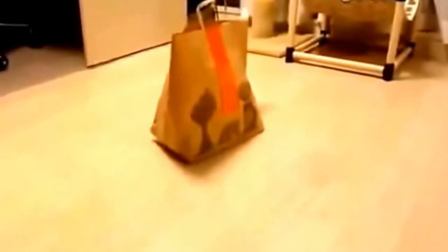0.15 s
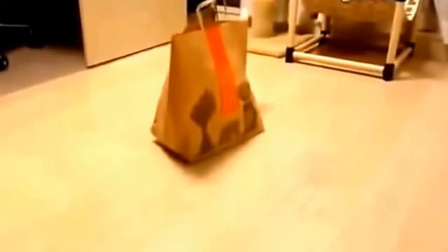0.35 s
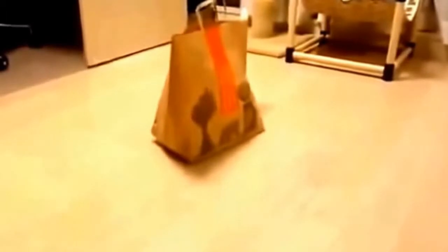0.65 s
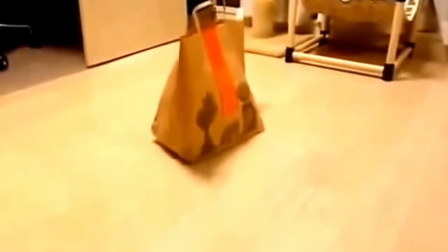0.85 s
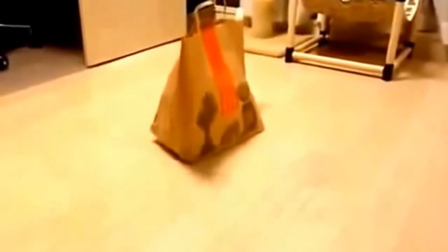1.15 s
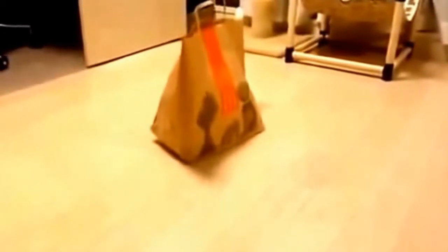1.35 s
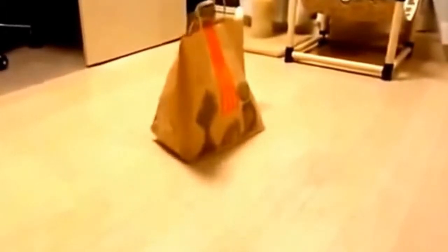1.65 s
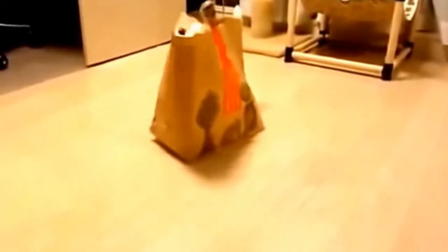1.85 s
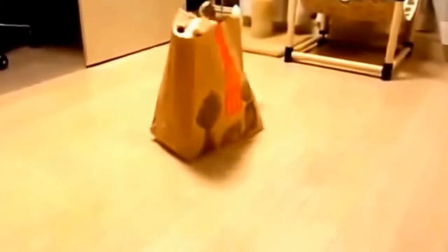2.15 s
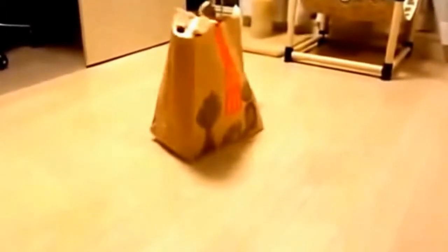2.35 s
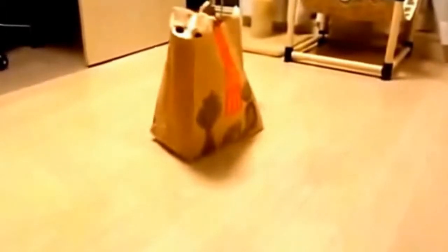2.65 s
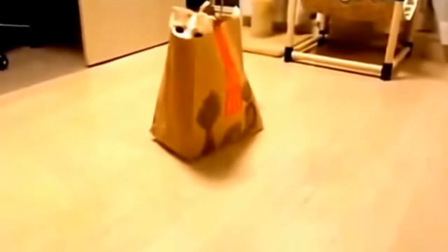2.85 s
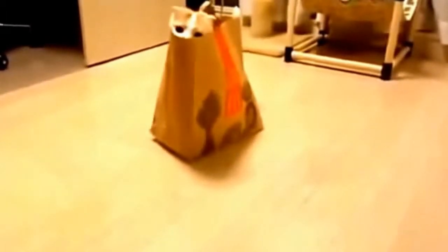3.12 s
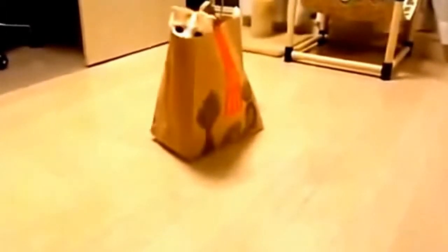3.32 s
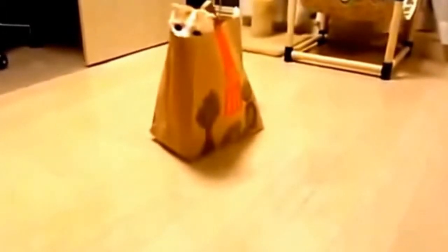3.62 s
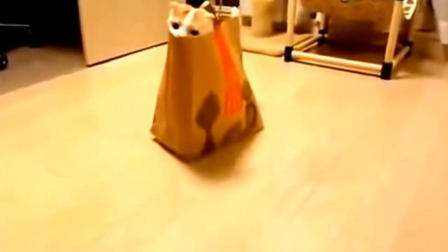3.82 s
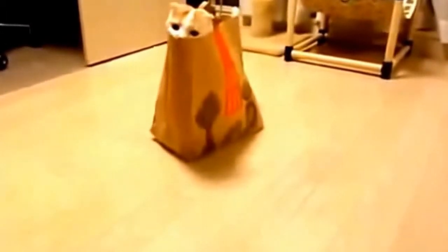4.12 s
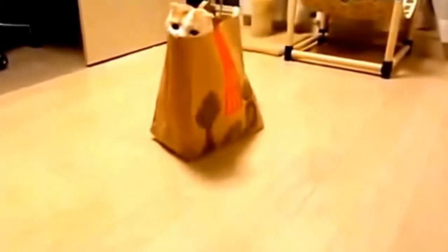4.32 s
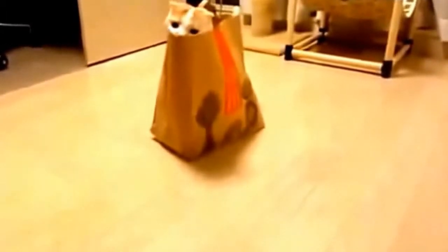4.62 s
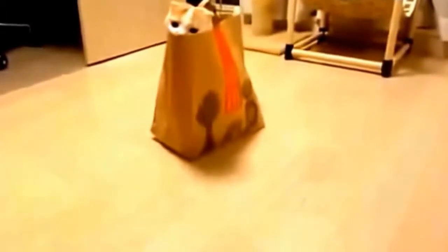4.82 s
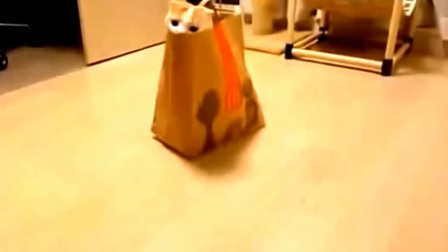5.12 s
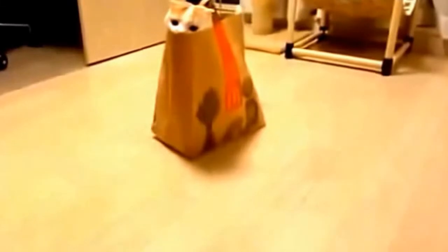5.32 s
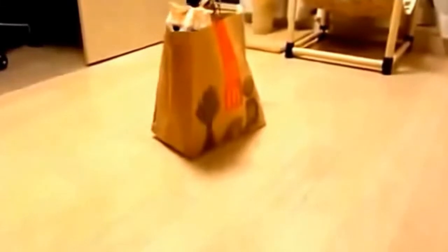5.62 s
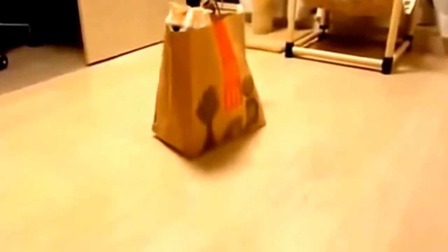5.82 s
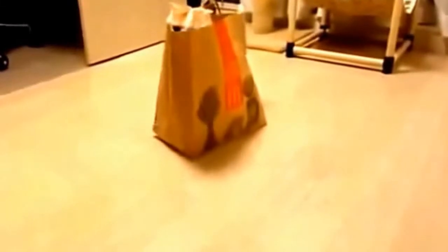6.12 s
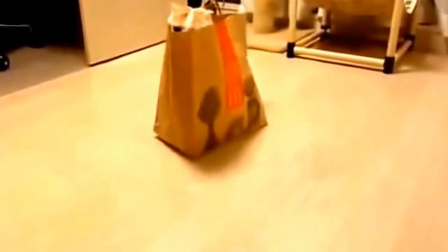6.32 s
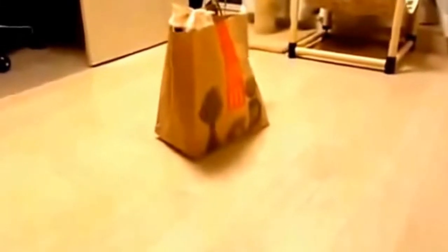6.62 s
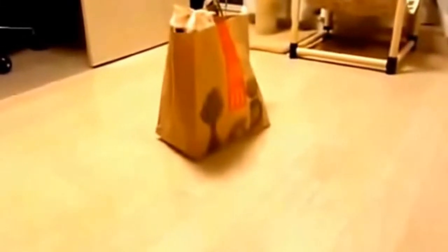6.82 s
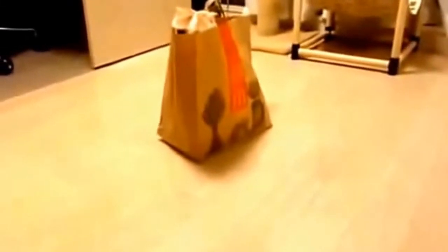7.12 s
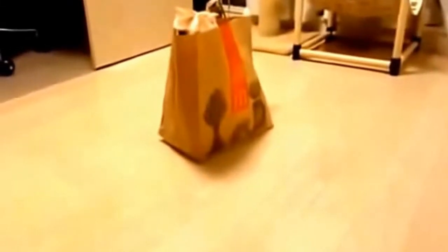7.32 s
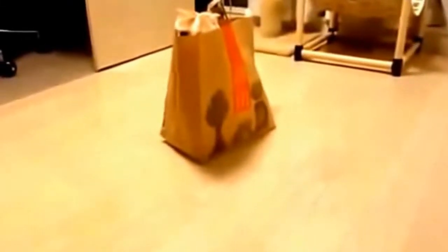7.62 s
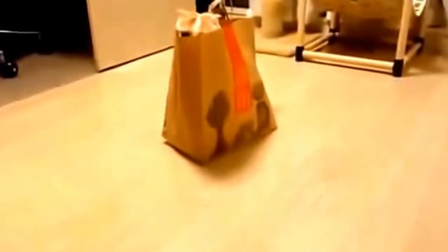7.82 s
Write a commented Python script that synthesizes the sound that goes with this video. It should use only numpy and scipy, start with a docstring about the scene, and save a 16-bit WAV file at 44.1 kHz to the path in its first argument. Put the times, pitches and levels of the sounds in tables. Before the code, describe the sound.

A cat shifts inside a paper bag on a wooden floor, a couple of metres from the microphone. Soft rustles and hollow pops of the stiff paper come in short bursts with pauses between. Past the middle, a louder, sharper crinkle breaks out, followed by a run of crackles and pops before the bag settles. A low appliance hum and soft hiss continue in the slightly echoing room.

```python
"""A bare room with a wooden floor, where a cat shifts inside a paper bag a couple of metres away.
Stiff panels buckle with hollow pops, creases snap, and stick-slip friction of fur and paper gives swarms
of tiny crackles and a few thin squeaks; once there is a very high tick. The bag's resonances colour the
crackles, and the room reverberates over an appliance's low hum and a soft hiss."""
import sys
import numpy as np
from scipy import signal
from scipy.fft import rfft, irfft, next_fast_len
from scipy.io import wavfile
from scipy.ndimage import uniform_filter1d

SR = 44100
rng = np.random.default_rng(int(sys.argv[2]) if len(sys.argv) > 2 else 0)


def to_wav(sig):
    """Store sig (one row per channel, or 1-D mono) as 16-bit WAV at the path in sys.argv[1].

    Samples outside -1..1 are clipped; the rate is SR.
    """
    pcm = np.clip(np.atleast_2d(sig), -1, 1) * 32767
    pcm = np.round(pcm).astype(np.int16)
    wavfile.write(sys.argv[1], SR, pcm.T)  # frames by channels


N = 350947
TIME = np.arange(N) / SR

# Spectrum of room air and microphone hiss. Each row: frequency in Hz, relative density in dB.
AIR_SPECTRUM = [(20, -15), (30, -7), (45, -11), (65, -5.5), (90, 1.5), (140, -2), (220, -11), (370, -16.5),
                (560, -11.5), (730, -4.5), (900, -13), (1400, -15.5), (2500, -20), (6500, -27.5),
                (12000, -26.5), (15000, -36.5)]
# Stereo width of the background noise; toward the highest treble both channels carry the same sound. Each row:
# frequency in Hz, side minus mid level in dB.
HISS_SPREAD = [(30, 0), (80, -14), (200, -7.5), (400, 1.5), (700, -11), (1300, -2.5), (2400, -0.5),
               (4400, 2), (8000, 0), (12000, -85)]
# Tones of a household appliance. Each row: frequency in Hz, level in dB.
HUM_TONES = [(59.5, -82), (87.5, -62), (91.5, -62), (118.4, -63), (371, -69), (484.5, -67.5), (710.6, -66),
             (1050, -75)]
# The cat rubs against the paper. Each row: time of the peak in seconds, relative level in dB,
# swell and fade times in seconds, brightness in dB, relative level of the panels' flutter in dB.
CAT_RUBS = [(0.765, -66, 0.024, 0.054, -8, -41.5), (0.875, -59, 0.042, 0.04, -4.5, -43.5),
            (1.08, -44, 0.054, 0.04, -9.5, -38.5), (1.186, -40, 0.041, 0.056, -11.5, -39.5),
            (1.299, -48.5, 0.047, 0.058, -2, -41.5), (2.54, -49.5, 0.049, 0.07, -0.5, -42),
            (2.645, -41.5, 0.062, 0.073, -22, -43), (2.695, -43.5, 0.026, 0.064, -15.5, -42),
            (2.805, -51, 0.059, 0.096, -8.5, -49), (3.62, -64, 0.1, 0.027, -0.5, -68),
            (3.905, -50.5, 0.032, 0.035, -15, -39.5), (4.02, -71, 0.072, 0.054, -24, -40.5),
            (4.1, -43, 0.04, 0.028, -10, -45), (4.235, -44.5, 0.065, 0.064, -10.5, -36.5),
            (4.372, -48.5, 0.13, 0.049, -8, -46), (4.97, -47, 0.052, 0.033, -20, -61),
            (5.09, -57.5, 0.037, .03, 7.5, -47), (5.125, -28, 0.01, 0.038, -11.5, -35),
            (5.16, -32, 0.025, 0.036, -20, -41), (5.204, -33.5, 0.02, 0.027, -7.5, -45),
            (5.245, -34, 0.025, 0.034, -22, -43.5), (5.37, -40.5, 0.045, 0.086, -39, -45),
            (5.825, -54.5, 0.04, 0.059, -0.5, -62), (5.857, -31, 0.017, 0.029, -34, -34),
            (6.09, -40, 0.053, 0.075, -13.5, -42.5), (6.225, -45.5, 0.044, 0.05, -5.5, -50),
            (6.262, -33.5, 0.024, 0.023, -9.5, -42), (6.378, -40, 0.042, 0.054, -16, -39.5),
            (6.826, -41, 0.017, 0.034, -10.5, -46)]
# Resonances of the bag. Each row: frequency in Hz, bandwidth in Hz, gain in dB.
BAG_MODES = [(381, 13, -6), (554, 38, -3), (760, 71, -2), (855, 110, -1), (1044, 110, 4), (1440, 46, -0.5),
             (1773, 35, -3), (2210, 98, -6), (2780, 26, -4), (3240, 81, -13), (3800, 56, -27)]
# Stereo width of the reverberation. Each row: frequency in Hz, side minus mid level in dB.
ECHO_SPREAD = [(80, -2), (400, -27), (700, -19), (1300, -7.5), (2400, -2), (4400, 2.5), (8000, -3),
               (12000, -12)]
# A crease gives way. Each row: start in seconds, relative level in dB, pitch in Hz,
# bandwidth in octaves, brightness in dB, decay time in seconds.
CREASE_SNAPS = [(0.1504, -43.5, 3500, 1.8, -18, 0.0033), (0.162, -49, 3000, 1.9, -17, 0.0036),
                (1.058, -36, 1720, 0.78, -40, 0.004), (1.191, -34, 935, 0.58, -9, 0.0022),
                (1.876, -48.5, 1390, 1.3, -45, 0.003), (1.886, -51, 1890, 0.93, -37, 0.0037),
                (2.495, -57, 900, 1.5, -19, 0.0018), (2.644, -47, 1400, 1.3, -34, 0.004),
                (2.66, -43, 1200, 1.1, -28, 0.0018), (2.779, -49, 1200, 1.2, -26, 0.0036),
                (2.917, -53, 740, 1.2, -24, 0.0014), (4.0704, -40, 800, 1.3, -34, 0.0022),
                (4.084, -38, 1260, 1, -22, 0.0038), (4.194, -40, 750, 0.7, -15, 0.0018),
                (4.2145, -30.5, 875, 0.62, -15, 0.0014), (4.314, -37.5, 980, 0.81, -9.5, 0.0028),
                (4.909, -37, 1870, 1.03, -56, 0.0025), (4.97, -41, 1290, 1.7, -34, .003),
                (5.103, -25, 1700, 1.6, -1.5, 0.0041), (5.143, -33.5, 1500, 1.6, -10, 0.0046),
                (5.154, -25, 2700, 1.2, -18, 0.0028), (5.1915, -27.5, 2300, 0.97, 0, 0.0019),
                (5.3595, -26.5, 1750, 0.65, -68, 0.003), (5.42, -37, 1540, 1.6, -18, 0.0029),
                (5.46, -43, 2360, 1.1, -35, 0.0033), (5.814, -49, 2250, 1.4, -24, 0.0034),
                (5.842, -32.5, 1900, 2.1, -28, 0.0064), (5.849, -31, 3800, 1.35, -40, 0.0049),
                (5.857, -29, 2070, 1.25, -33, 0.0041), (5.993, -46, 1300, 0.96, -23, 0.0027),
                (6.077, -32, 3000, 1.4, -21, 0.0026), (6.139, -38.5, 1400, 1.2, -33, 0.0026),
                (6.2437, -28, 1710, 1.06, 0, 0.0026), (6.265, -33, 2700, 1.6, -18, 0.0043),
                (6.31, -28.5, 1390, 1.3, -14, 0.0018), (6.3689, -31, 1500, 1.6, -28, 0.0036),
                (6.375, -32.5, 2900, 0.72, -28, 0.0022), (6.521, -37.5, 1500, 1.5, -40, 0.0025),
                (6.8, -43, 1300, 1.6, -21, 0.0037), (6.812, -43, 1500, 1.8, -6, 0.002)]
# Hollow pops of the bag's panels, some followed about 12 ms later by a short echo.
# Each row: start in seconds, relative level in dB, pitch in Hz, decay time in seconds.
PANEL_POPS = [(0.153, -45, 696, 0.003), (0.82, -34, 400, 0.0033), (0.884, -32.5, 424, 0.0046),
              (0.9955, -30.5, 353, 0.0052), (1.064, -33.5, 451, 0.008), (1.1895, -19.5, 398, 0.0018),
              (1.2035, -24.5, 510, 0.0036), (1.268, -26.5, 280, 0.0043), (1.277, -30, 444, 0.013),
              (1.37, -35.5, 460, 0.0026), (1.875, -31, 550, 0.0022), (1.888, -39, 554, 0.0045),
              (2.458, -41.5, 526, 0.0049), (2.496, -28.5, 510, 0.0014), (2.603, -32, 423, 0.0026),
              (2.673, -27, 381, 0.0034), (2.777, -30.5, 417, 0.0041), (2.876, -39, 376, 0.0036),
              (2.916, -36, 360, 0.0038), (2.948, -34.5, 300, 0.0026), (3.894, -31.5, 358, 0.0039),
              (3.912, -27, 387, 0.0027), (4.0706, -27, 313, 0.006), (4.083, -25, 330, 0.0034),
              (4.193, -22, 305, 0.0032), (4.2045, -22.5, 532, 0.0083), (4.208, -34.5, 853, 0.0059),
              (4.2142, -22.5, 320, 0.0035), (4.252, -35, 540, .003), (4.313, -23, 387, 0.0025),
              (4.388, -34, 420, 0.003), (4.398, -37, 308, 0.0051), (4.909, -32, 600, 0.0031),
              (4.932, -31, 560, 0.0031), (4.97, -40, 680, 0.0047), (5.105, -33, 694, 0.0046),
              (5.42, -30, 744, 0.0034), (5.851, -29.5, 496, 0.0032), (5.855, -24, 1010, 0.0045),
              (5.859, -21, 760, 0.0043), (6.016, -29, 350, 0.0018), (6.112, -29.5, 364, 0.0036),
              (6.124, -28.5, 380, 0.0044), (6.229, -24.5, 409, 0.0067), (6.246, -30, 1214, 0.005),
              (6.312, -31.5, 670, 0.0054), (6.322, -33, 359, 0.0086), (6.352, -33, 335, 0.0044),
              (6.378, -28.5, 674, 0.0048), (6.5215, -24.5, 620, 0.003), (6.532, -32.5, 559, 0.0053),
              (6.8008, -33.5, 730, 0.0042)]
# Paper scrapes on paper. Each row: time of the peak in seconds, level in dB, half length in seconds,
# pitch in Hz, bandwidth in Hz.
PAPER_SQUEAKS = [(0.166, -55, 0.007, 3300, 600), (1.086, -55, 0.013, 5450, 220),
                 (2.56, -63, 0.035, 5700, 1300), (6.819, -47.5, 0.0084, 1710, 1100)]

BAG_SHIFT = 0.023  # the bag's changing shape shifts its resonances by up to about this fraction
CRACKLE_WET_DB, POP_WET_DB = -2.5, -0.5  # reverberation against direct sound


def undb(db):
    """Decibels to amplitude ratio."""
    return 10 ** (np.asarray(db) / 20)


def unit(x):
    """Scale to rms 1."""
    return x / np.sqrt(np.mean(x ** 2))


def add(track, s, sound):
    """Superpose a sound on a stereo track at s seconds."""
    i = int(s * SR)
    track[:, i:i + sound.shape[1]] += sound[:, :N - i]


def shape(x, gain_at):
    """Zero-phase filter, its gain a function of frequency."""
    size = next_fast_len(len(x), True)
    f = np.maximum(np.fft.rfftfreq(size, 1 / SR), 1)
    return irfft(rfft(x, size) * gain_at(f), size)[:len(x)]


def band(x, lo_hz, hi_hz, order=2):
    """Band-pass that conserves the power of white noise."""
    def gain_at(f):
        detuning = (f ** 2 - lo_hz * hi_hz) / (f * (hi_hz - lo_hz))
        return unit(1 / np.hypot(1, detuning ** order))
    return shape(x, gain_at)


def dull(x, top_hz, order=6):
    """Steep low-pass."""
    return shape(x, lambda f: 1 / np.hypot(1, (f / top_hz) ** order))


def colour(x, points):
    """Impose a spectral envelope of (Hz, dB) points."""
    hz, db = np.transpose(points)
    return shape(x, lambda f: undb(np.interp(np.log(f), np.log(hz), db)))


def walk(rate):
    """Random modulation of spread near 1, with rate knots per second."""
    knots = rng.standard_normal(int(N / SR * rate) + 2)
    return 1.4 * np.interp(TIME * rate, np.arange(len(knots)), knots)


def diffuse(size, width):
    """Partly coherent stereo noise: width sets the side level against the mid at each frequency."""
    mid, side = rng.standard_normal(size), colour(rng.standard_normal(size), width)
    return np.array([mid + side, mid - side])


def air_and_hum(air_db=-54.5):
    """Noise floor: broadband air and hiss under hum tones that waver in amplitude and phase."""
    air = unit(np.array([colour(channel, AIR_SPECTRUM) for channel in diffuse(N, HISS_SPREAD)]))
    air *= undb(air_db + 0.5 * walk(6.4))
    hum = sum(undb(db + walk(4.8)) * np.sin(2 * np.pi * hz * TIME + walk(4.6)) for hz, db in HUM_TONES)
    return air + np.sqrt(2) * hum


def crackle(size, rate, spread_db):
    """Fibre slips as a Poisson process, rate per second: most are faint, a few stand out."""
    slips = rng.random(size) < rate / SR
    strengths = undb(spread_db * np.minimum(rng.exponential(size=size), 4)) / np.sqrt(rate)
    return unit(slips * strengths * rng.choice([-1, 1], size))


def treble(clicks, bright_db, crisp_db, sheen_db):
    """Sharper impulses reach higher in the spectrum: two treble bands grow with brightness."""
    crisp = band(clicks * undb(crisp_db + 0.5 * bright_db), 2830, 7130, order=3)
    sheen = band(clicks * undb(sheen_db + bright_db), 7800, 13060, order=3)
    return crisp + sheen


def rubbing(rest_db=-68, rest_bright_db=-5.5, rest_flutter_db=-52.5, flutter_exponent=0.74):
    """Incoherent rubs add in power; returns level, brightness and flutter over time, in dB."""
    power, flutter = undb(rest_db) ** 2, undb(rest_flutter_db) ** 2  # the cat is never quite still
    bright = power * undb(rest_bright_db) ** 2
    for s, db, swell_s, fade_s, bright_db, flutter_db in CAT_RUBS:
        force = np.exp(-np.maximum((s - TIME) / swell_s, (TIME - s) / fade_s))
        power += (undb(db) * force) ** 2
        bright += (undb(db + bright_db) * force) ** 2
        # the big panels give easily, so their flutter starts sooner and lasts longer
        flutter += (undb(flutter_db) * force ** flutter_exponent) ** 2
    return 10 * np.log10([power, bright / power, flutter])


def rustle(loud_db=-35, loud_slips_per_s=10000):
    """Stick-slip friction: swarms of slips, denser under harder rubbing, and shaking of the big panels."""
    level_db, bright_db, flutter_db = rubbing()
    unsteady_db = walk(70)
    rate = np.clip(loud_slips_per_s * undb(0.5 * (level_db - loud_db)), 800, SR / 2)
    slips = crackle(N, rate, spread_db=1.5) * undb(level_db + unsteady_db)
    mids = undb(-8.5) * band(slips, 760, 2070)
    highs = undb(-5) * treble(slips, bright_db, crisp_db=-4.5, sheen_db=2.5)
    shakes = crackle(N, rate=1600, spread_db=1) * undb(flutter_db + unsteady_db)
    flutter = band(shakes, 288, 611) + undb(-13.5) * band(shakes, 130, 255)
    return mids + highs + undb(-7) * flutter


def bag(x, tuning, facet_count=6, low_hz=1086, high_hz=6020, facet_width_hz=77, facet_db=-3):
    """Modal resonance: the panels, the enclosed air and a few small facets of random pitch ring."""
    facets_hz = low_hz * (high_hz / low_hz) ** rng.random(facet_count)
    modes = list(BAG_MODES) + [(hz, facet_width_hz, facet_db) for hz in facets_hz]
    return x + sum(undb(db) * signal.lfilter(*signal.iirpeak(hz * tuning, hz / width_hz, fs=SR), x)
                   for hz, width_hz, db in modes)


def room(x, wet_db, t60_low_s=0.33, t60_high_s=0.46, build_s=0.00089):
    """Reverberation: direct sound, then a diffuse tail, different for every spot on the bag."""
    t = np.arange(SR // 2) / SR
    noise = diffuse(len(t), ECHO_SPREAD)
    low = signal.sosfilt(signal.butter(1, 4000, fs=SR, output="sos"), noise)
    tail = low * undb(-60 * t / t60_low_s) + (noise - low) * undb(-60 * t / t60_high_s)
    tail *= 1 - np.exp(-t / build_s)
    tail *= undb(wet_db) / np.sqrt(np.sum(tail.mean(axis=0) ** 2))
    response = signal.unit_impulse(len(t)) + tail
    return signal.fftconvolve(x[None], response, axes=1)[:, :N]


def shifting_bag(x, pose_s=0.25):
    """Resonance depends on shape: each pose of the cat retunes the bag and changes its echoes."""
    out, size = np.zeros((2, N)), int(pose_s * SR)
    for i in range(0, N, size):
        piece = np.pad(x[i:i + size], (0, SR // 20))
        ringing = bag(piece, tuning=1 + BAG_SHIFT * rng.uniform(-1.1, 1))
        add(out, i / SR, room(ringing, CRACKLE_WET_DB))
    return out


def dry_cracks(release, smooth_hz=700):
    """Spectral whitening: cracks under an envelope are evened out so that no pitch stands out."""
    spectrum = rfft(release * crackle(len(release), rate=22000, spread_db=3))
    smooth_bins = max(int(smooth_hz * len(release) / SR), 1)
    power = uniform_filter1d(np.abs(spectrum) ** 2, smooth_bins)
    return irfft(spectrum / np.sqrt(power), len(release)) * np.sqrt(np.sum(release ** 2))


def snaps(lead_s=0.008, rise_s=0.00098, trail_s=0.025, crease_top_hz=7600):
    """Release of elastic energy: a crease cracks around its own pitch, and smaller slips trail after."""
    out = np.zeros((2, N))
    t = np.maximum(np.arange(SR // 7) / SR - lead_s, 0)
    for s, db, hz, octaves, bright_db, fade_s in CREASE_SNAPS:
        trail_db = -13 - 0.5 * (db + 35)  # a harder snap lets go more cleanly
        decay = np.exp(-t / fade_s) + undb(trail_db) * np.exp(-t / trail_s)
        release = (1 - np.exp(-t / rise_s)) * decay
        cracks = undb(db + 0.5) * dry_cracks(release)
        edge_ratio = 2 ** (octaves / 2)
        crease = dull(band(cracks, hz / edge_ratio, hz * edge_ratio), crease_top_hz)
        highs = treble(cracks, bright_db, crisp_db=-4.5, sheen_db=-2.5)
        lows = undb(-4) * band(cracks, 90, 650)
        ringing = bag(crease + highs + lows, tuning=1 + BAG_SHIFT * rng.uniform(-0.74, 1))
        add(out, s - lead_s, room(ringing, CRACKLE_WET_DB))
    return out


def pops(rise_s=0.001, overtone_db=-13, thump_db=-22, leak_hz=160):
    """Damped vibration: a panel's pop, or its short echo, is a note, an overtone and a faint thump."""
    out, t = np.zeros((2, N)), np.arange(SR // 10) / SR
    for s, db, hz, ring_s in PANEL_POPS:
        overtone_hz = 1.988 * hz * rng.uniform(0.823, 1.04)
        thump_hz = 190 * rng.uniform(0.26, 1.5)
        note = np.sin(2 * np.pi * hz * t)
        overtone = undb(overtone_db) * np.sin(2 * np.pi * overtone_hz * t)
        thump = undb(thump_db) * np.sin(2 * np.pi * thump_hz * t)
        envelope = (1 - np.exp(-t / rise_s)) * np.exp(-t / ring_s)
        pop = undb(db + 7.5) * (note + overtone + thump) * envelope
        add(out, s, room(pop, POP_WET_DB, t60_low_s=0.26))
    # acoustic short circuit: slow motion only pushes air round the panel's edge, so the bass is lost
    return signal.sosfilt(signal.butter(2, leak_hz, "highpass", fs=SR, output="sos"), out)


def squeaks():
    """Narrow-band stick-slip: paper drags over paper for an instant."""
    out, slips = np.zeros(N), rng.standard_normal(N)
    for s, db, half_s, hz, width_hz in PAPER_SQUEAKS:
        envelope = np.exp(-0.5 * ((TIME - s) / half_s) ** 2)
        out += undb(db) * envelope * band(slips, hz - width_hz / 2, hz + width_hz / 2)
    return out


def tick(s=5.1925, gain_db=-9.5, rise_s=0.0003, band_hz=(8600, 13000), side_db=-7):
    """An impulse, perhaps a claw piercing the paper, heard a little differently at each microphone."""
    out, t = np.zeros((2, N)), np.arange(SR // 50) / SR
    release = np.exp(-t / 0.0017)
    mid, side = dry_cracks(release), undb(side_db) * dry_cracks(release)
    envelope = (1 - np.exp(-t / rise_s)) * np.exp(-t / 0.004)
    cracks = envelope * np.array([mid + side, mid - side])
    high_band = signal.butter(3, band_hz, "bandpass", fs=SR, output="sos")
    add(out, s, undb(gain_db) * signal.sosfilt(high_band, cracks))
    return out


def scene(left_db=0.24):
    """Superposition: the bag, almost straight ahead, sounds over the room's noise floor."""
    rubs = shifting_bag(rustle() + squeaks())
    return (rubs + snaps() + pops() + tick() + air_and_hum()) * undb([[left_db], [-left_db]])


def record(dry, notch_hz=7950, top_hz=14750):
    """Frequency response of a small camera: a narrow treble notch and a steep upper cutoff."""
    notched = signal.lfilter(*signal.iirnotch(notch_hz, Q=22, fs=SR), dry)
    return signal.sosfilt(signal.ellip(8, 0.2, 70, top_hz, fs=SR, output="sos"), notched)


dry = scene()
out = record(dry)
to_wav(out)
```